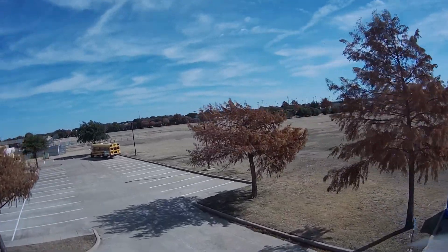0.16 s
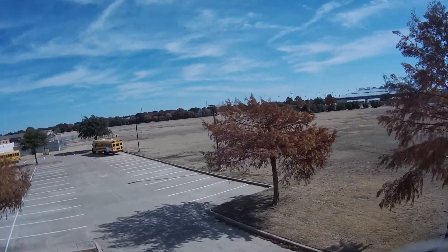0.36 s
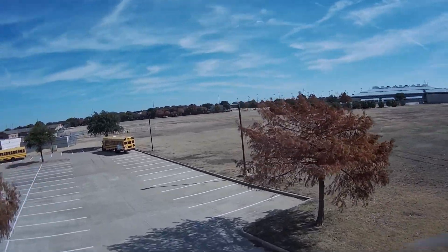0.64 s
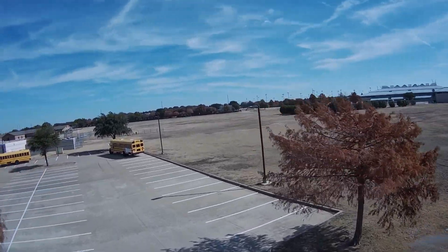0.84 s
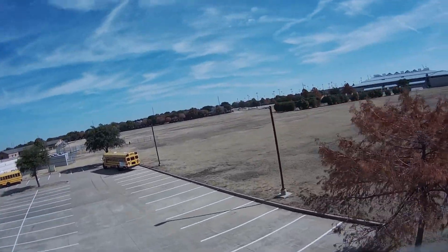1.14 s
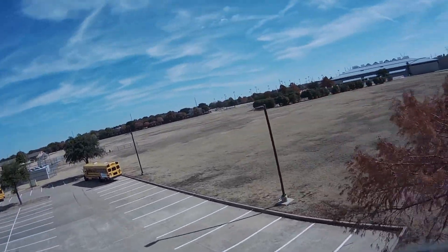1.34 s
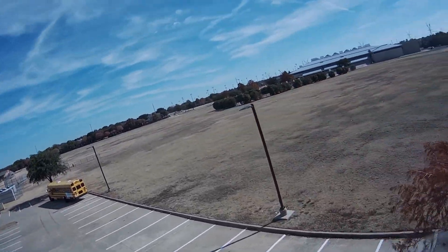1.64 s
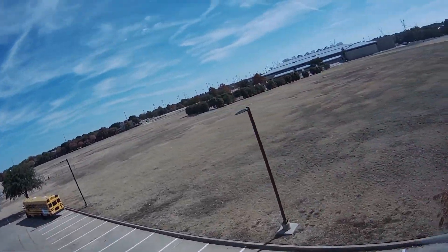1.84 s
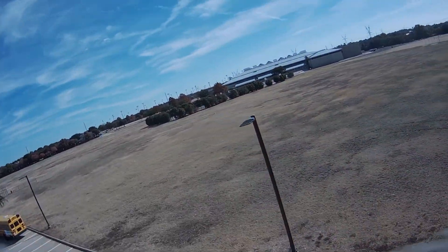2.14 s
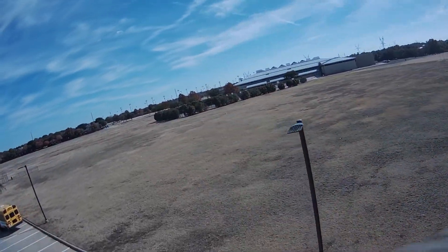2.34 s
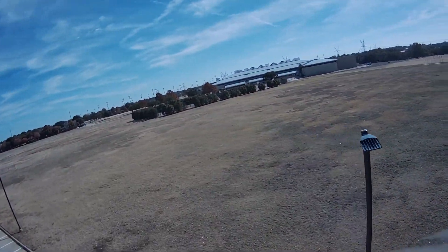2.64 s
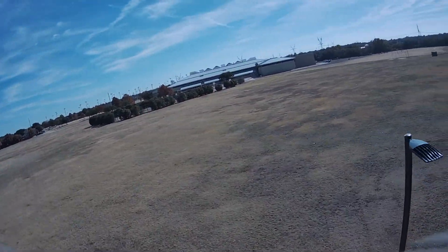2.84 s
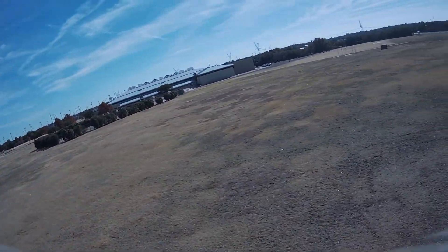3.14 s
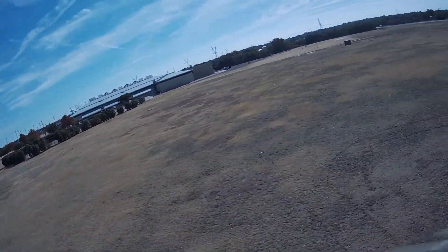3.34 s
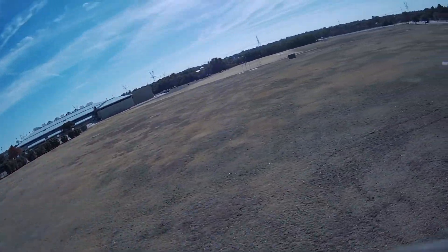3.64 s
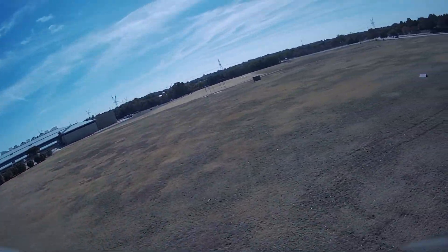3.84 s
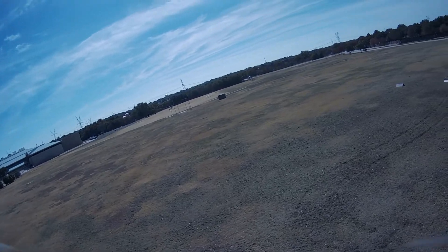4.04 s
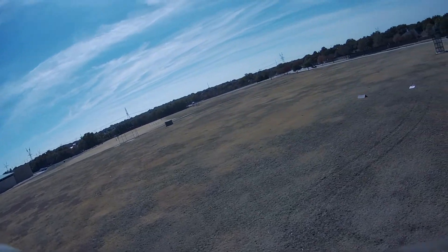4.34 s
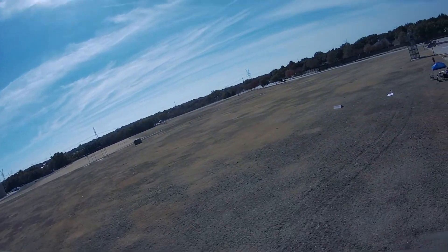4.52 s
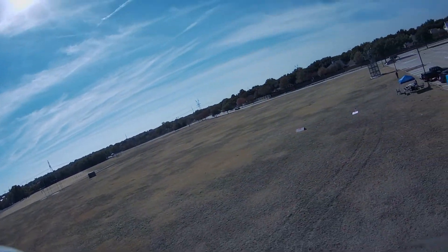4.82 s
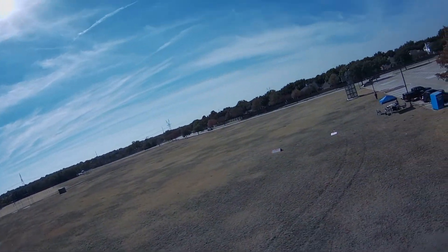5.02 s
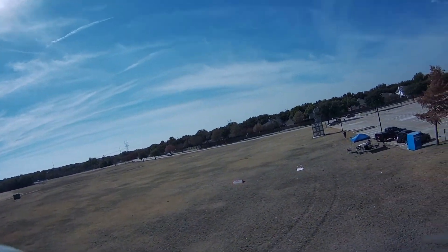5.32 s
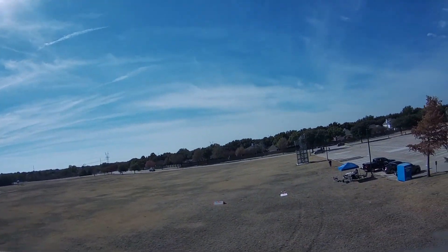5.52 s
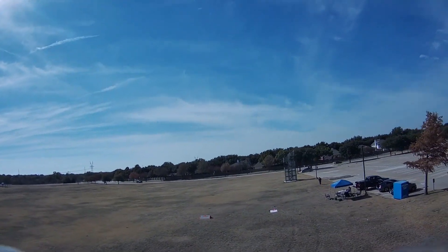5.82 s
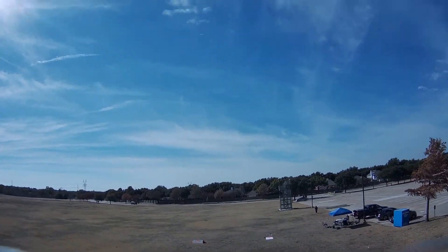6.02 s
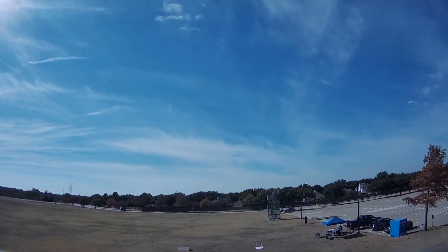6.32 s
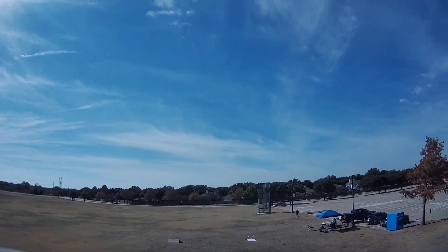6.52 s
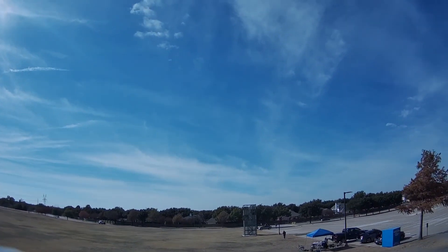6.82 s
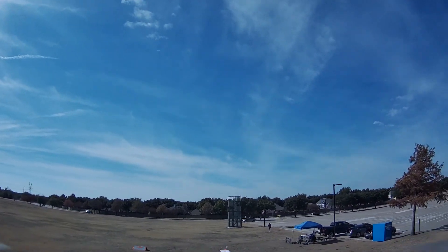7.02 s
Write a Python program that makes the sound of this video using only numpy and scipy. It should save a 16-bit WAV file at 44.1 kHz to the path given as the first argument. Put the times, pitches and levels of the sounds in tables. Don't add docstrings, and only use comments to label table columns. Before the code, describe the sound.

Close, on-board stereo sound of a small four-propeller model flying in open air. From the start four slightly different rotor tones beat together in a nasal, trembling buzz, the front pair highest, with a thin, very high electric whine above. Turbulent wash hisses broadly and wind rumbles low, a little more on the right. Pitch rises slightly until about 0.7 s and holds to 2 s; the wind is strongest from about 1.5 to 3 s. A faint, unsteady high whistle enters near 1.1 s and grows clearer from 2.9 s. As the craft banks, the front rotors spread apart in pitch while wash swells around 3.5 s. At 4.8 s the pitch drops and the wind thins. Around 6 s it sags further, the whistle pausing, then jumps up sharply near 6.4 s, dips at 6.7 s and recovers, whistling again, still running as it ends at about 7 s.

```python
import sys
import numpy as np
from scipy import signal
from scipy.fft import rfft, irfft, next_fast_len
from scipy.io import wavfile

SR = 44100
rng = np.random.default_rng(int(sys.argv[2]) if len(sys.argv) > 2 else 0)


def volts_from_decibels(level):
    exponent = np.asarray(level, float) / 20
    return 10 ** exponent


def inscribe(sig):
    pcm = np.round(np.clip(np.atleast_2d(sig).T, -1, 1) * 32767)
    wavfile.write(sys.argv[1], SR, pcm.astype(np.int16))


N = 316197
PADDED = next_fast_len(N)
BIN_HZ = np.arange(PADDED // 2 + 1) * SR / PADDED
TIME_S = np.arange(N) / SR
TOP_HZ = 15530
CRUISE_HZ = 900
WHINE_MULTIPLE = 12


def rms_one(x):
    return x / np.sqrt(np.mean(x ** 2) + 1e-20)


def in_time(rows):
    s, *columns = np.transpose(rows)
    return np.array([np.interp(TIME_S, s, column) for column in columns])


def at_hz(points, hz):
    knots_hz, levels_db = np.array(points)[:, 0], np.array(points)[:, 1]
    return np.interp(np.log(hz + 1e-9), np.log(knots_hz), levels_db)


def drift(rate):
    pole = np.exp(-80 * np.pi * rate / SR)
    noise = rng.standard_normal(N // 40 + 2002)
    slow = signal.lfilter([1], [1, -2 * pole, pole * pole], noise)[2000:]
    return np.interp(np.arange(N) / 40, np.arange(len(slow)), rms_one(slow))


def sides(db):
    return volts_from_decibels(np.reshape([db / 2, -db / 2], (2, -1)))


def arriving(angle, pan_db, lead):
    phases = np.reshape([lead / 2, -lead / 2], (2, -1))
    return np.sqrt(2) * sides(pan_db) * np.sin(angle + phases)


# start_s, pitch_hz
THROTTLE_CURVE = [(0, 915), (.22, 935), (.7, 955), (1.9, 955), (2.4, 941), (3.2, 930.7), (3.95, 918.5),
                  (4.63, 920.5), (4.83, 833), (5.3, 823.3), (5.6, 836), (5.97, 813), (6.08, 714),
                  (6.25, 695.4), (6.38, 962), (6.52, 980), (6.74, 868.6), (6.9, 927.5)]
# start_s, offset_hz
BANK_CURVE = [(0, -20.4), (.22, -5.1), (.37, -8.4), (.61, -18.3), (.69, -38.7), (1.04, -29.4), (1.09, -14),
              (1.45, -14.3), (1.65, -26.6), (1.84, -1.2), (1.96, .5), (2.17, -32.1), (2.37, -27.5),
              (2.87, 7.4), (3.14, 46.1), (3.5, 64), (4.6, 64), (4.9, 56)]
# start_s, offset_hz
NOSE_CURVE = [(.2, 105), (.35, 76), (.68, 123), (.9, 124), (2.75, 102), (3.5, 128), (3.9, 95), (4.599, 102),
              (4.85, 107), (5.3, 91), (5.75, 134), (5.98, 104), (6.25, 87), (6.4, 112), (6.55, 96),
              (6.8, 62), (7.1, 10), (7.17, 31)]
# start_s, offset_hz
TWIST_CURVE = [(0, 27.5), (.5, 24.6), (.68, 6), (.9, 29), (2.35, 41.7), (3.3, 23.6), (4.9, 38.6),
               (5.4, 25.6), (5.75, 42), (6.09, 9), (6.25, 10), (6.4, 38), (6.551, 50), (6.8, 40),
               (6.95, 16)]
# centre_s, half_length_s, front_pair_hz, bank_hz
QUICK_CORRECTIONS = [(.48, .05, -6, -11.8), (.8, .02, -8, 11.5), (1.15, .02, -8, -7.6),
                     (1.275, .025, 4, 12.3), (1.32, .025, -12, -14.4), (1.89, .04, 0, -14.9),
                     (1.965, .02, 0, -5.5), (2.02, .02, 0, 5.5), (2.34, .02, 0, -15.4), (2.53, .03, 0, 5.5),
                     (2.81, .03, -4, -3.9), (2.9, .04, 12, 0), (2.99, .04, 0, -16.1), (3.12, .05, -8, 0),
                     (3.22, .03, 6, 4), (3.5, .025, 10, 10), (3.69, .05, 8, -8), (4.79, .04, 0, -9),
                     (5.58, .08, 0, -8), (5.685, .02, -48, 4), (5.74, .03, 5, -20), (5.82, .08, -4, -8),
                     (6.16, .1, 0, 8), (6.49, .085, 0, -17), (6.7, .04, 0, -18)]


def pitches():
    curves = (THROTTLE_CURVE, BANK_CURVE, NOSE_CURVE, TWIST_CURVE)
    throttle, bank, nose, twist = (in_time(rows)[0] for rows in curves)
    centre_s, half_s, front_hz, bank_hz = np.transpose(QUICK_CORRECTIONS)[:, :, None]
    bells = np.exp(-((TIME_S - centre_s) / half_s) ** 2)
    front = throttle + (front_hz * bells).sum(axis=0)
    bank = bank + (bank_hz * bells).sum(axis=0)
    rear = throttle - nose
    return front + bank, front - bank, rear + twist, rear - twist


def hunting(hz):
    swings_per_s = 8.5
    angle = 2 * np.pi * swings_per_s * TIME_S + 2.5 * drift(1.5)
    swing = rms_one(np.sin(angle) * volts_from_decibels(4 * drift(1.2)))
    return hz * (swing + 0.5 * drift(17.46))


HARMONICS = {2: (11.3, 10.9, 1.5, 2.5), 3: (4.5, -18, -3, -23), 4: (-3.5, 4, -9, -15), 6: (-2, -24, 7, 16)}
# frequency_hz, density_db_per_hz
HOUSING_COLOUR = [(500, -8), (1400, -11.5), (2300, -5.5), (2800, -1.5), (3400, 0.54), (3700, -11),
                  (4050, -5), (4800, -5), (5050, -8), (6000, -1), (7800, -8), (9200, -8.5), (10500, -5),
                  (13300, -7.5), (15200, -3.5)]


def rotor(pitch, unrest_hz, shade_db, strength, whine_gain, harmonics_db, place, whine_place, flutter_db):
    hz = pitch + unrest_hz
    octaves = np.log2(pitch / CRUISE_HZ)
    tone_db, bite_db = np.reshape(strength, (2, 2)) @ [np.ones(N), octaves]
    angle = 2 * np.pi * np.cumsum(hz) / SR
    sound = volts_from_decibels(tone_db + shade_db + flutter_db * drift(29.0)) * arriving(angle, *place)

    for multiple, db in zip(HARMONICS, harmonics_db):
        gain = volts_from_decibels(bite_db + db + 1.4 * at_hz(HOUSING_COLOUR, multiple * hz) + 1.78 * drift(44.0))
        sound = sound + gain * np.sqrt(2) * np.sin(multiple * angle + rng.uniform(0, 2 * np.pi))

    knots_hz, pans_db, leads = np.transpose(whine_place)
    whine_pan_db = np.interp(WHINE_MULTIPLE * hz, knots_hz, pans_db)
    whine_lead = np.interp(WHINE_MULTIPLE * hz, knots_hz, leads)
    whine = arriving(WHINE_MULTIPLE * angle, whine_pan_db, whine_lead)
    whine_db = at_hz(whine_gain, WHINE_MULTIPLE * pitch) + 2.5 + 2.0 * drift(34.0)
    return sound + volts_from_decibels(whine_db) * whine


# blade_tone_db, its_rise_db_per_octave, harmonics_db, their_rise_db_per_octave
ROTOR_STRENGTH = [
    (-32, 3.5, -46.5, 12),
    (-34, 14.5, -47.5, 5),
    (-52.5, 4, -47.5, 2),
    (-49, 7, -60, 12),
]
# left_right_db, left_lead_rad
ROTOR_PLACE = [
    (-2.0, .35),
    (2.6, -.17),
    (1.5, -.2),
    (6.5, .15),
]
# frequency_hz, level_db
WHINE_RESPONSE = [
    [(9300, -46), (10400, -56), (10600, -43), (11150, -44), (11800, -40), (12200, -43)],
    [(7550, -50), (9250, -44.5), (10200, -40), (10800, -38.5), (11600, -41.5)],
    [(7500, -54), (9000, -46), (10150, -45), (10450, -40.5), (11000, -42)],
    [(7200, -54), (8300, -45), (9400, -40), (9800, -41), (10500, -38)],
]
# frequency_hz, left_right_db, left_lead_rad
WHINE_ARRIVAL = [
    [(9200, 0, 4.2), (10600, 7, 4.5), (11100, 9, 2.4), (11800, -1, 4.4)],
    [(9200, -3, 4.4), (10300, 4, 2.1), (10700, 7, 2.4), (11600, 4, 2.8)],
    [(9100, -3, 4.6), (10100, 1, 2.3), (10500, 1, 2.4), (11000, 3, 2.4)],
    [(8300, -1, 3.1), (9400, -1, 2.3), (9900, 0, 2.6), (10500, 1, 2.3)],
]
# start_s, level_db
TURN_SHADE = [(2.73, -0.5), (2.8, -5.5), (3.2, -4), (3.8, -5), (4.2, -3.5), (6.2, -4.5), (6.45, -2.5),
              (6.75, -3.5), (7.1, -2)]


def rotors():
    shade_db = in_time(TURN_SHADE)[0]
    shades = shade_db, 0, 2.0 * drift(1.7), -1.1 * shade_db + 3.9 * drift(2.1)
    together, apart, fast, slow = map(hunting, (4.5, 3.5, 4, 6))
    steep = np.clip(in_time(BANK_CURVE)[0] / 45 - 1, 0, .2) / .2
    together, apart = together * (1 - .4 * steep), apart * steep
    unrest = together + apart, together - apart, fast, slow
    harmonics_db = np.transpose(list(HARMONICS.values()))
    rows = zip(pitches(), unrest, shades, ROTOR_STRENGTH, WHINE_RESPONSE, harmonics_db,
               ROTOR_PLACE, WHINE_ARRIVAL)
    return sum(rotor(*row, flutter_db=1.0) for row in rows)


# start_s, wind_db, wash_db
AIR_LEVELS = [(0, -42, -38.5), (.4, -41.5, -39.5), (.68, -39.5, -38), (1.04, -42.5, -40),
              (1.46, -37, -38.5), (2.14, -39, -40), (2.64, -39, -38.5), (3.05, -45, -37),
              (3.55, -43.5, -36), (4.27, -44, -38), (5.33, -47, -39), (6.27, -47.5, -39), (6.41, -45, -40),
              (6.77, -49.5, -41), (7.17, -50.5, -40)]
# frequency_hz, density_db_per_hz
OPPOSED_COLOUR = [(500, -12), (1400, -18.5), (2200, -21.5), (3800, -33.5), (4500, -19), (5300, -17),
                  (6300, -8.5), (7300, -11.5), (8200, -3.5), (8900, -7), (10000, 1.5), (12500, -7.5),
                  (13600, -3), (15200, -6)]
RANGE_FOLLOWS = [
    (0.96, 7.5),
    (1, 2.5),
    (0.16, 6.0),
]


def wash(patchy_db):
    mean_db = -39
    swing_db = in_time(AIR_LEVELS)[1] - mean_db
    octaves = np.log2(in_time(THROTTLE_CURVE)[0] / CRUISE_HZ)
    levels_db = [mean_db + share * swing_db + rise_db * octaves for share, rise_db in RANGE_FOLLOWS]

    colour = volts_from_decibels(np.array([at_hz(HOUSING_COLOUR, BIN_HZ), at_hz(OPPOSED_COLOUR, BIN_HZ)]))
    common, opposed = rfft(rng.standard_normal((2, PADDED))) * colour
    both = common + opposed * [[1], [-1]]
    both = both * np.clip(BIN_HZ / 400, 0, 1) ** 2 * (BIN_HZ < TOP_HZ)
    low, up_to_high = (1 / (1 + (BIN_HZ / edge_hz) ** 12) for edge_hz in (3900, 7700))

    out = 0
    for band, db, lift_db in zip((low, up_to_high - low, 1 - up_to_high), levels_db, (1.2, 1.6, 3.6)):
        noise = rms_one(irfft(both * band, PADDED)[:, :N])
        out = out + volts_from_decibels(db + lift_db + patchy_db * drift(8.0)) * noise
    return out


def port_noise(spectrum, own_db, own_pan_db):
    shape = volts_from_decibels(at_hz(spectrum, BIN_HZ)) * np.clip(BIN_HZ / 25, 0, 1) ** 2 * (BIN_HZ < 5500)
    common, left, right = rfft(rng.standard_normal((3, PADDED))) * shape
    own = volts_from_decibels(own_db) * np.array([left, right]) * sides(own_pan_db)
    own = own / (1 + (BIN_HZ / 1900) ** 4)
    return rms_one(irfft(common + own, PADDED)[:, :N])


# frequency_hz, density_db_per_hz
GUST_COLOUR = [(60, -28), (110, -3), (190, 0), (340, -1), (550, -10), (1000, -12), (1600, -15.5),
               (2400, -28), (4400, -23), (5500, -33)]
# frequency_hz, density_db_per_hz
RUMBLE_COLOUR = [(25, -26), (50, -14), (75, -3.5), (120, 0), (200, 0), (400, -19)]


def wind(lumpy_db):
    level_db = in_time(AIR_LEVELS)[0] + 0.27
    gust_gain = volts_from_decibels(level_db + lumpy_db * (drift(5.6) + drift(2.5)))
    gusts = gust_gain * port_noise(GUST_COLOUR, -6.5, -2.5) * sides(-1.8)
    rumble_gain = volts_from_decibels(-50 + 0.16 * (level_db + 45.5))
    return gusts + rumble_gain * port_noise(RUMBLE_COLOUR, -15.0, 0.1)


# start_s, end_s, multiple_of_blade_pitch, level_db
WHISTLE_SPELLS = [
    (1.1, 2.9, 5.19, -56),
    (2.93, 4.77, 5.17, -50),
    (4.79, 6.0, 5.75, -50),
    (6.35, 6.62, 5.19, -54),
    (6.85, 7.3, 5.19, -49),
]


def whistle(wander_hz):
    fade_s = .04
    blade_hz = pitches()[0]
    wander = wander_hz * drift(11.25)
    out = 0
    for start_s, end_s, multiple, db in WHISTLE_SPELLS:
        spell = np.clip(np.minimum(TIME_S - start_s, end_s - TIME_S) / fade_s + .5, 0, 1)
        angle = 2 * np.pi * np.cumsum(multiple * blade_hz + wander) / SR
        out = out + volts_from_decibels(db) * spell * np.sin(angle)
    return volts_from_decibels(3.0 + 2.37 * drift(9.4)) * np.sqrt(2) * out


def scene():
    return rotors() + wash(patchy_db=0.48) + wind(lumpy_db=1.05) + whistle(wander_hz=22.0)


# centre_hz, width_hz, usual_depth (0-1), depth_gained in calm (0-1)
HOLLOW_BANDS = [(4150, 170, .35, .45), (4450, 130, .3, .35), (4740, 140, .45, .25), (13650, 160, .2, 0),
                (12900, 450, .15, 0)]


def hollowed(x):
    common = rfft(x.mean(axis=0), PADDED)
    calm = np.clip((-39 - in_time(AIR_LEVELS)[0]) / 16, 0, 1)
    calm = calm + np.clip((930 - in_time(THROTTLE_CURVE)[0]) / 160, 0, .6)
    for hz, width_hz, depth, more in HOLLOW_BANDS:
        band = irfft(common * np.exp(-.5 * ((BIN_HZ - hz) / width_hz) ** 4), PADDED)[:N]
        x = x - np.clip(depth + more * calm + .3 * drift(9.0), 0, .97) * band
    return x


def low_pass(x):
    return signal.sosfilt(signal.butter(12, 16830, fs=SR, output="sos"), x)


def record(dry):
    rounded = 0.18 * np.tanh(volts_from_decibels(0.39) * dry / 0.2)
    spectrum = rfft(hollowed(rounded), PADDED)
    mix = irfft(spectrum * (BIN_HZ < TOP_HZ), PADDED)[:, :N]
    return low_pass(mix)


dry = scene()
out = record(dry)
inscribe(out)
```